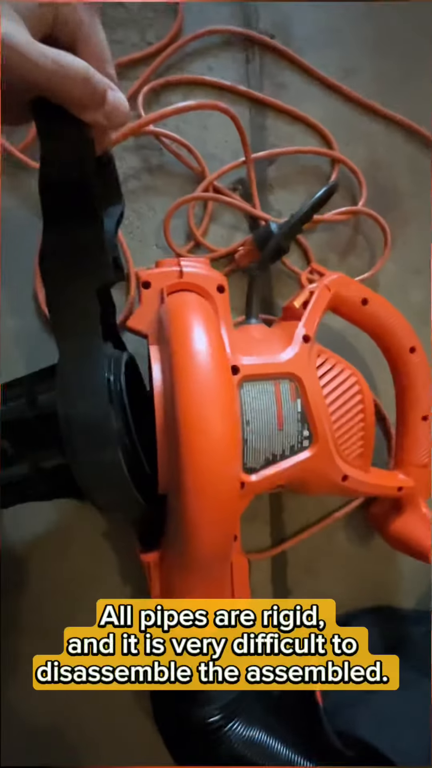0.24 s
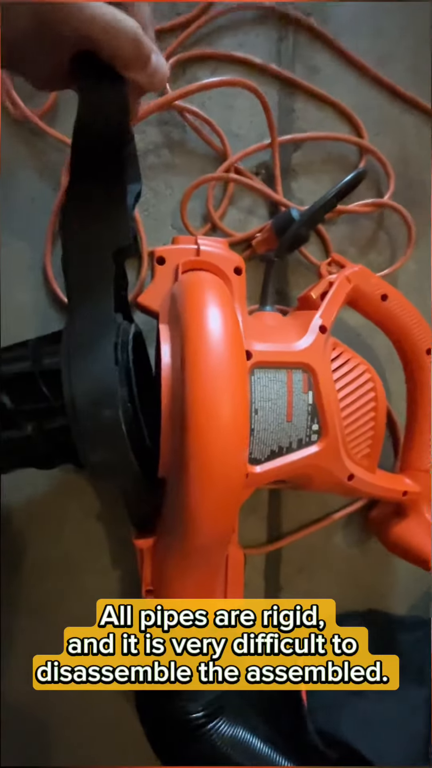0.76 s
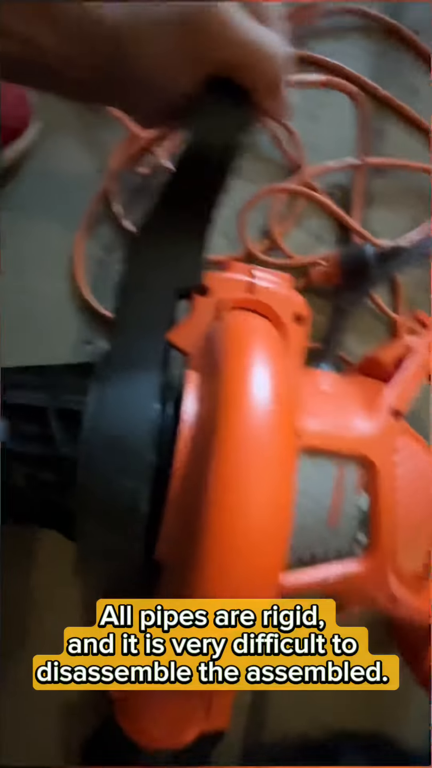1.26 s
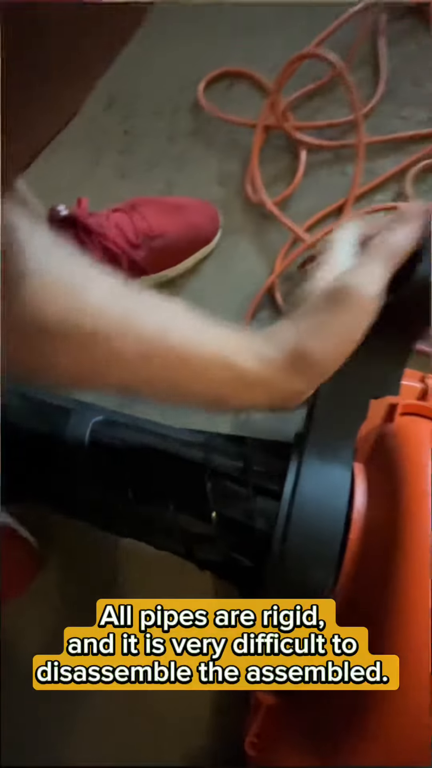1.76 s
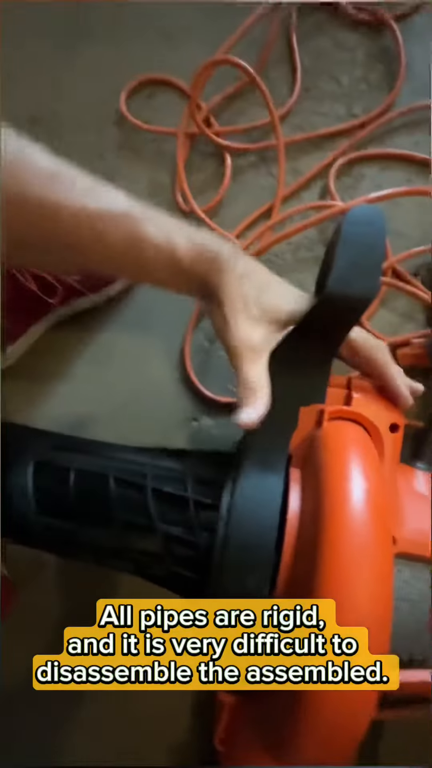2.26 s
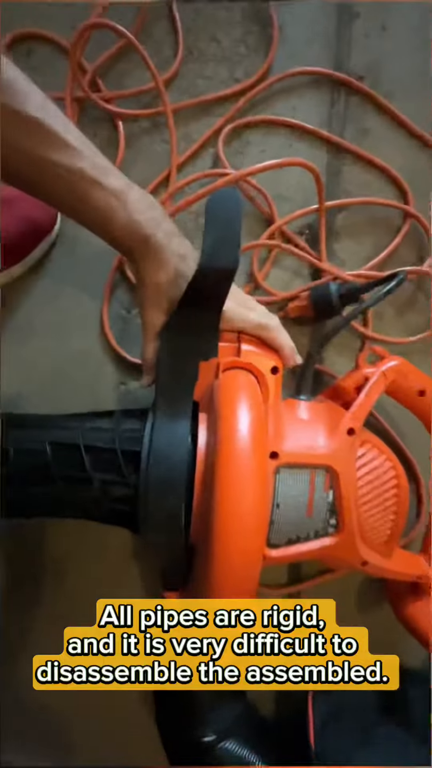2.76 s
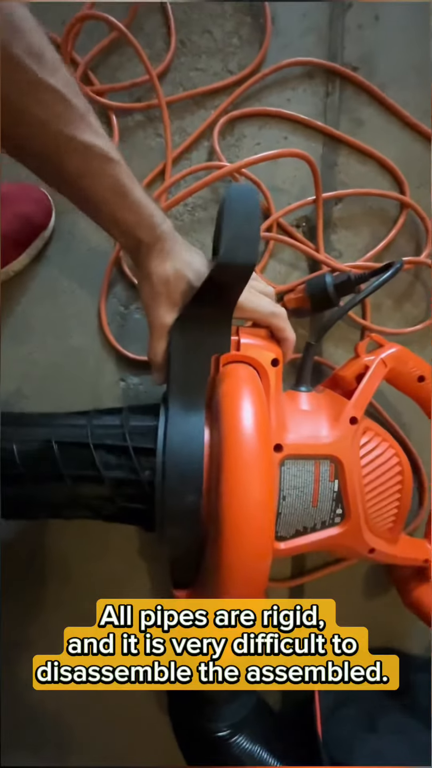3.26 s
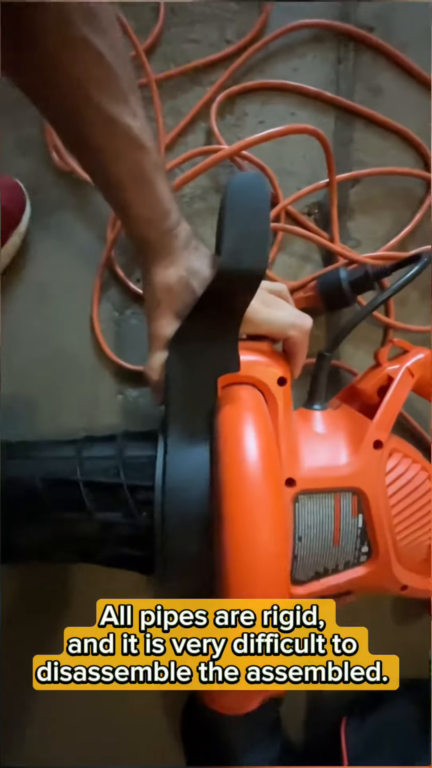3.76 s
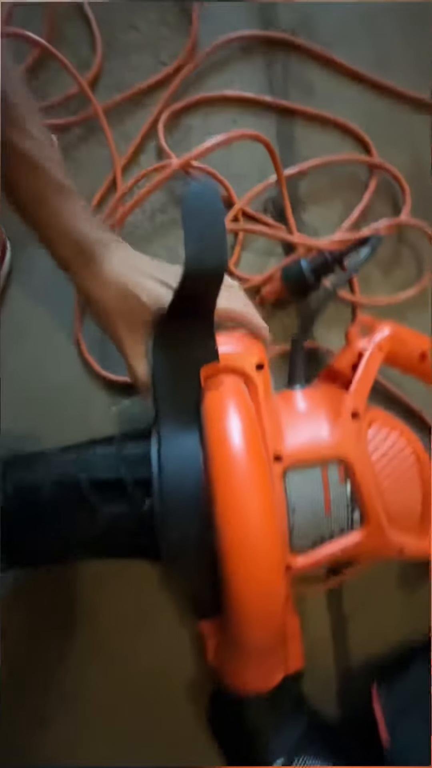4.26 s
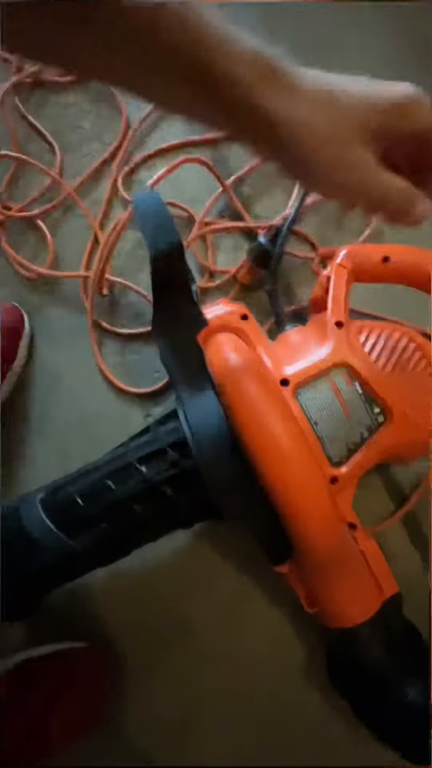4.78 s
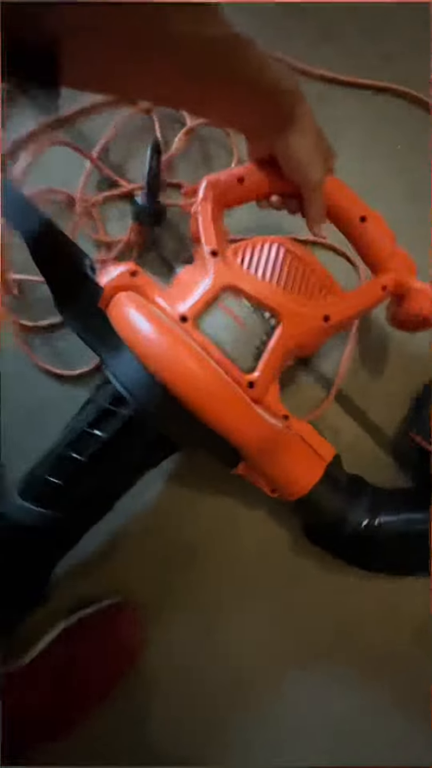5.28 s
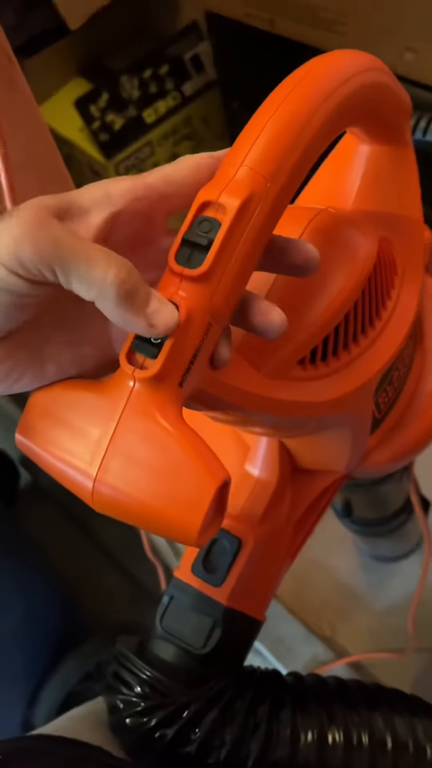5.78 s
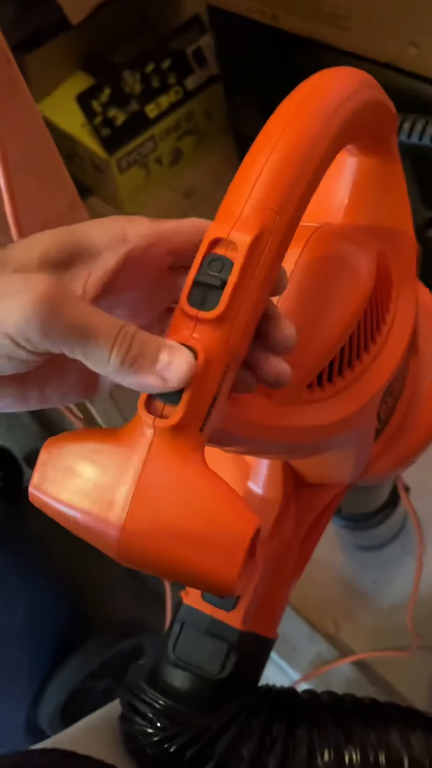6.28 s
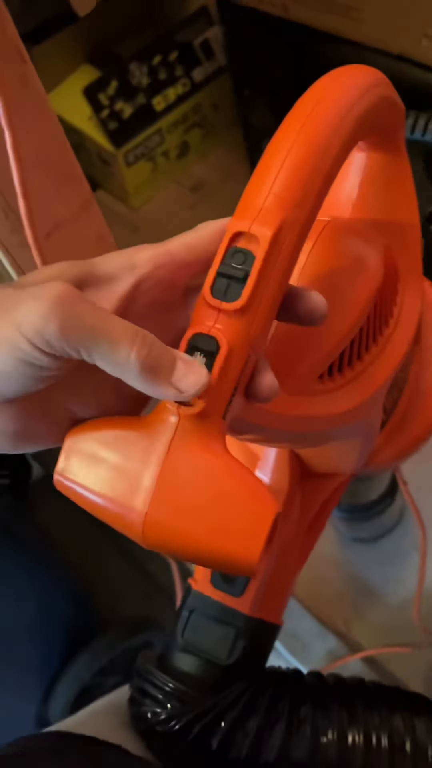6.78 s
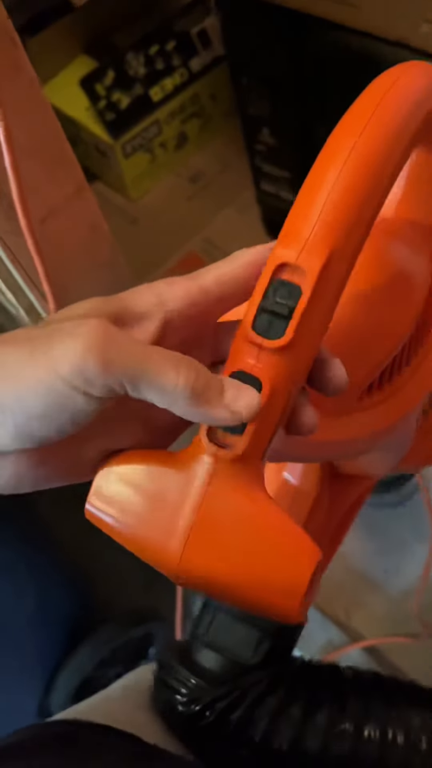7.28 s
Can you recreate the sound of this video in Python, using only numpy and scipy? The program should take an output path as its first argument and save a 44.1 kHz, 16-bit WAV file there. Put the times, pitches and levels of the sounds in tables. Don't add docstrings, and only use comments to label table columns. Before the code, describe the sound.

On a hard garage floor, hands twist and push hollow plastic blower parts together. Sharp cracks, hollow knocks and low thuds alternate with short scrapes, creaks and faint skin rubs, with the hardest snaps around the middle. Low handling rumble bumps the close stereo phone microphone. Then it switches abruptly to the blower already running, a steady broadband roar with hum and thin motor whine, through to the end.

```python
import sys
import numpy as np
from scipy import signal
from scipy.fft import rfft, irfft, next_fast_len
from scipy.io import wavfile
from scipy.ndimage import uniform_filter1d, map_coordinates

SR = 44100
rng = np.random.default_rng(int(sys.argv[2]) if len(sys.argv) > 2 else 0)


def voltage_ratio(level):
    return 10 ** (np.asarray(level, float) / 20)


def wrap_up_sound(samples):
    columns = np.atleast_2d(samples).T
    tamed = np.clip(columns, -1, 1)
    steps = np.round(tamed * 32767).astype(np.int16)
    wavfile.write(sys.argv[1], SR, steps)


N = 332073
WORKSHOP_S, RUNNING_S = (0, 5.5), (5.4, 7.6)
LEAN_DB = -1.5
STREAK_DB = 1.2


def unit(x):
    return x / np.sqrt(np.mean(x ** 2) + 1e-20)


def along(points, hz):
    f, v = np.transpose(points)
    return np.interp(np.log(hz + 1), np.log(f + 1), v)


def curves(rows):
    s, *cols = np.transpose(rows)
    return [np.interp(np.arange(N) / SR, s, c) for c in cols]


def wobble(rate):
    coarse = np.arange(0, N + 64, 64)
    knots = rng.standard_normal(int(N * rate / SR) + 4)
    return np.interp(np.arange(N), coarse, map_coordinates(knots, [coarse * rate / SR]))


def filtered(x, response):
    m = next_fast_len(x.shape[-1] + 8192)
    return irfft(rfft(x, m) * response(np.fft.rfftfreq(m, 1 / SR)), m)[..., :x.shape[-1]]


def stereo_noise(spectrum, alike, span, patchy_db, streak_db=0):
    first, last = (min(round(s * SR), N) for s in span)
    z = signal.stft(rng.standard_normal((2, last - first)), nperseg=512)[2]
    chance = rng.standard_normal((2,) + z.shape[1:])
    patches = uniform_filter1d(uniform_filter1d(chance[0], size=5, axis=0), size=10, axis=1)
    streaks = uniform_filter1d(uniform_filter1d(chance[1], size=2, axis=0), size=50, axis=1)
    gain = voltage_ratio(patchy_db * unit(patches) + streak_db * unit(streaks))
    pair = signal.istft(z * gain, nperseg=512)[1][:, :last - first]

    def middle_and_side(hz):
        angle = np.arccos(np.clip(along(alike, hz), -1, 1)) / 2
        return voltage_ratio(along(spectrum, hz)) * [np.cos(angle), np.sin(angle)]

    mid, side = filtered(pair, middle_and_side)
    return np.pad(np.array([mid + side, mid - side]) / np.std(mid), ((0, 0), (first, N - last)))


def strokes(s, hold_s, db, law):
    rise, fall, rest_db = law
    t = np.arange(0, N + 128, 128)[:, None] / SR
    each_db = db - rise * np.maximum(s - t, 0) - fall * np.maximum(t - s - hold_s, 0)
    total_db = 10 * np.log10((voltage_ratio(each_db) ** 2).sum(1) + voltage_ratio(rest_db) ** 2)
    return np.interp(np.arange(N) / SR, t[:, 0], total_db)


def resonances(table, lean, longest_s=2 / 3, shared=0.26):
    out = np.zeros((2, N))
    for start_s, end_s, centre_hz, width_hz, db in table:
        at = slice(round(start_s * SR), min(round(end_s * SR), N))
        noise = rng.standard_normal((2, round(longest_s * SR)))[:, :at.stop - at.start]
        noise = noise + shared * noise[::-1]
        song = filtered(noise, lambda hz: 1 / (1 + (2 * (hz - centre_hz) / width_hz) ** 2) ** 1.5)
        swell = np.abs(np.sin(np.pi * np.linspace(0, 1, song.shape[1]) ** lean)) ** 0.75
        out[:, at] += voltage_ratio(db) * unit(song) * swell
    return out


# t/s, hold/s, level/dB
SHAKES = [
    (0.0, 3.4, -50.5),
    (2.406, 1.5, -60.5),
    (3.78, 0.55, -51.5),
    (4.3, 0.071, -45.5),
    (4.516, 0.12, -36.5),
    (4.653, 0.04, -32.5),
    (4.74, .06, -34),
    (4.82, .03, -40),
    (4.898, 0.034, -39.5),
]
# f/Hz, level/dB per Hz
JOSTLE = [(22, -40), (40, -13), (58, 1), (145, -6.5), (250, -11.5), (500, -22.5), (900, -40), (1500, -84)]
# shake level/dB, opposition level/dB
OPPOSE = [(-63, -43.5), (-37, 8.5)]


def jostle():
    level_db = strokes(*np.transpose(SHAKES), law=(230, 250, -60.5))
    oppose_db = np.interp(level_db, *np.transpose(OPPOSE))
    noise = stereo_noise(JOSTLE, [(50, 0.018)], WORKSHOP_S, patchy_db=3.0)
    one, other = noise * voltage_ratio(1.4 * wobble(35))
    return voltage_ratio(level_db) * (0.55 * one + voltage_ratio(oppose_db - 0.5) * other * [[1.1], [-.9]])


# f/Hz, level/dB, time to fall 60 dB t/s
SHELL = [(851, -3.5, 0.047), (1000, -5, 0.032), (1092, 6, 0.006), (1267, 4.5, 0.012), (1484, 0.5, 0.014),
         (2010, -4, 0.014), (2340, -8.5, 0.0082)]
# f/Hz, level/dB
SNAP = [(300, -57), (900, 3.5), (1800, 0.5), (3500, -1), (5000, -6.5), (7000, -19), (16000, -62)]
# f/Hz, level/dB
SPARK = [(1500, -60), (3000, 2), (5500, 0), (10000, 14), (16000, -7.5)]
# f/Hz, level/dB
PUSH = [(25, -56), (70, -6.5), (200, 9.5), (450, 1.5), (800, -12), (2000, -90)]


def contacts(table, thump_db, give_s, crack_s, early_s):
    t = np.arange(SR // 5) / SR
    out = np.zeros((2, N + len(t)))
    colours = lambda hz: voltage_ratio([[along(points, hz)] for points in (SNAP, SPARK, PUSH)])
    noises = [unit(noise) for noise in filtered(rng.standard_normal((3, 2, N + len(t))), colours)]
    wall_hz, wall_db, wall_s = np.transpose(SHELL)[:, :, None]
    scatter_db = 2
    rise = (1 - np.exp(-t / give_s)) ** 2
    crack_fade = voltage_ratio(-60 * t / crack_s) + 0.075 * voltage_ratio(-60 * t / 0.11)
    thump = voltage_ratio(thump_db) * np.sin(2 * np.pi * 65 * (t - .026)) * np.exp(-((t - .026) / 0.0083) ** 2)
    late, sag, sag_s = np.maximum(t - .003, 0), 0.13, .025
    thud_turns = (1 - sag / 2) * late + sag * sag_s * (1 - np.exp(-late / sag_s))
    for s, crack_db, knock_db, thud_db, thud_hz in table:
        luck = rng.standard_normal((4, len(SHELL), 1))
        start = round((s - early_s) * SR)
        at = slice(start, start + len(t))
        grit, spark, puff = (noise[:, at] for noise in noises)

        hard_db = min(0.28 * (crack_db - knock_db) - 18.0, -3)
        crack = voltage_ratio(crack_db) * (grit + voltage_ratio(hard_db) * spark) * crack_fade

        ring_level = voltage_ratio(wall_db + scatter_db * luck[0] - 60 * t / (wall_s + crack_s))
        rings = ring_level * np.sin(2 * np.pi * wall_hz * (1 + 0.052 * luck[1]) * t)
        knock = voltage_ratio(scatter_db * luck[2:, :, 0]) @ rings

        fade = voltage_ratio(-60 * t / (0.2 * (200 / thud_hz) ** 1.2)) * (1 - t / t[-1]) ** 0.28
        swell = (1 - np.exp(-late / 0.0028)) * fade
        hollow = np.sin(2 * np.pi * thud_hz * thud_turns) + 0.076 * np.sin(2 * np.pi * 2.4 * thud_hz * t)
        body = 0.32 * (puff[0] + 0.78 * puff) * (1 - np.exp(-t / 0.0054)) * voltage_ratio(-60 * t / 0.13)
        thud = swell * hollow + body + thump

        sound = rise * (crack + voltage_ratio(knock_db - 5.5) * knock + voltage_ratio(thud_db + 4.5) * thud)
        out[:, at] += sound * voltage_ratio([[LEAN_DB / 2], [-LEAN_DB / 2]])
    return out[:, :N]


# t/s, crack peak level/dB, knock level/dB, thud level/dB, thud f/Hz
HITS = [(0.193, -46, -103, -59, 200), (0.2942, -38.5, -43.5, -59, 274), (0.3408, -37.5, -47, -58, 270),
        (0.7677, -50, -46, -49, 425), (1.492, -56, -64, -45, 230), (1.618, -23, -21, -23, 211.5),
        (1.9117, -39, -61, -41.5, 190), (2.037, -35, -57, -55, 194), (2.3525, -36, -39, -52, 200),
        (2.4186, -13.5, -17.5, -22.5, 211.5), (2.9325, -67, -35, -26.5, 255), (3.6318, -8, -21, -28, 342),
        (3.6433, -2.5, -25, -49, 180), (4.4318, -19, -14, -24.5, 205.4), (4.4432, -23.5, -75, -29, 205),
        (4.6088, -46, -32, -35, 475), (4.7374, -52, -50, -42, 640), (5.2335, -29.5, -31.5, -38.5, 358),
        (5.2917, -33.5, -41, -46, 430)]
# t/s, crack peak
# level/dB, knock level/dB, thud level/dB, thud f/Hz
SLIPS = [(0.475, -50, -38, -44, 460), (0.4939, -36, -31.5, -46, 443), (0.8345, -22.5, -24.5, -27, 399),
         (1.538, -60, -60, -46, 242), (2.245, -60, -60, -44, 250), (0.8437, -42, -29, -41, 208),
         (0.9452, -36, -45, -34, 408), (0.9599, -17.5, -27.5, -34, 261), (0.968, -51, -29.5, -27, 244),
         (1.0294, -53, -43, -37, 221), (1.069, -47, -39, -40, 417), (1.2082, -41, -56, -34, 249),
         (1.7, -50, -37, -36, 205), (2.1194, -19, -65, -45, 245), (2.1361, -57, -41, -36, 250),
         (2.4997, -43, -51, -47, 195),
         (2.992, -20, -21.5, -32, 445), (3, -29, -22, -24, 368), (3.1642, -48, -39, -34.5, 338),
          (3.1955, -36, -26, -37, 301), (3.221, -47, -39, -35.5, 370), (3.566, -45, -30.5, -30, 366),
          (3.6, -31.5, -43, -27.5, 365), (3.6285, -10.5, -53, -24.5, 365), (3.633, -60, -60, -32, 247),
          (3.65, -24, -25, -26.5, 199.6), (3.664, -9.5, -24, -55, 182), (4.092, -48, -43, -44, 420),
          (4.295, -31, -50, -37.5, 335), (4.349, -43, -37, -35, 346), (4.474, -27, -37, -26, 234),
          (4.937, -33.5, -106, -66, 172), (5.05, -41, -74, -71, 210), (5.369, -64, -70, -46, 174)]


def hits():
    snaps = contacts(HITS, thump_db=-15.5, give_s=.0007, crack_s=0.011, early_s=0)
    slips = contacts(SLIPS, thump_db=-15.0, give_s=0.003, crack_s=0.024, early_s=0.001915)
    return snaps + slips


# f/Hz, time to fall 60 dB t/s
GARAGE = [(150, 0.92), (1000, 0.4), (4000, 0.098), (12000, 0.87)]


def garage(x):
    hz, t, z = signal.stft(rng.standard_normal((2, SR)), SR, nperseg=256)
    tail = signal.istft(z * voltage_ratio(-60 * t / along(GARAGE, hz)[:, None]), SR, nperseg=256)[1]
    delayed = np.pad(x, ((0, 0), (500, 0)))
    return signal.fftconvolve(delayed, tail / np.linalg.norm(tail[0]), axes=1)[:, :N]


# t/s, hold/s, level/dB
SLIDES = [(0.287, 0.26, -76), (0.794, 0.048, -62.5), (0.95, 0.054, -58), (1.204, 0.049, -73.5),
          (1.417, 0.05, -68), (1.5, 0.08, -62), (1.602, 0.18, -55), (1.85, 0.056, -62.5),
          (1.99, 0.26, -60.5), (2.333, 0.05, -62), (2.5, 0.14, -76), (3.187, 0.11, -76), (3.47, 0.12, -79),
          (3.876, 0.07, -81), (4.113, 0.087, -66), (4.308, 0.052, -55.5), (4.47, 0.32, -69.5),
          (4.947, 0.016, -59.5), (5.054, 0.021, -57), (5.24, 0.065, -62), (5.31, .15, -62.5)]
# f/Hz, level/dB per Hz
PALM = [(3500, -21), (6000, -7), (8000, -3), (10000, 1.5), (12000, -4), (14000, -2.5), (16000, -13)]


def palms(stutter_db):
    level_db = strokes(*np.transpose(SLIDES), law=(270, 113, -84.5))
    noise = stereo_noise(PALM, [(3000, .05)], WORKSHOP_S, patchy_db=1.5, streak_db=STREAK_DB)
    return voltage_ratio(level_db + stutter_db + 2.15 * wobble(79)) * noise


# t/s, hold/s, level/dB, rub over scrape level/dB
DRAGS = [(0.456, 0.38, -54.5, -12), (0.791, 0.033, -48, -7), (0.952, 0.031, -43, -10),
         (1.459, 0.12, -57.5, 0), (1.613, 0.16, -48.5, -3.5), (1.983, 0.29, -53, -0.5),
         (2.42, 0.093, -44.5, -9.5), (2.976, 0.058, -46, -15.5), (3.194, 0.033, -46, -18.5),
         (3.662, 0.016, -35, -2.5), (3.74, 0.18, -37, -4.5), (4.27, 0.11, -48.5, -2),
         (4.441, 0.043, -41, -7), (4.588, 0.04, -50, -4.5), (4.945, 0.018, -77, 15.5),
         (5.067, 0.084, -59.5, 1.2), (5.227, 0.042, -46.5, -8.5), (5.36, .15, -49.5, -4)]
# f/Hz, level/dB per Hz
SCRAPE = [(60, -45), (130, -23), (195, -6), (440, 0.5), (650, -3.5), (1070, 0), (2200, -15.5), (8000, -69)]
# f/Hz, level/dB per Hz
RUB = [(900, -16), (1800, 8), (2300, 5), (3500, 3.5), (4600, 1), (5600, -2.5), (7000, -12), (10000, -32)]


def drags(stutter_db):
    s, hold_s, db, bright_db = np.transpose(DRAGS)
    scrape_db = strokes(s, hold_s, db, law=(300, 54, -58))
    rub_db = strokes(s, hold_s, db + bright_db, law=(370, 68, -71))
    scrape = stereo_noise(SCRAPE, [(200, 0.37), (800, 0.0087)], WORKSHOP_S, patchy_db=1.05, streak_db=1.65)
    rub = stereo_noise(RUB, [(3000, 0.013)], WORKSHOP_S, patchy_db=1.0, streak_db=STREAK_DB)
    return voltage_ratio(scrape_db + stutter_db) * scrape + voltage_ratio(rub_db + stutter_db) * rub


# from t/s, to t/s, f/Hz, width f/Hz, level/dB
CREAKS = [(.45, 0.56, 2560, 2900, -59.5), (4.52, 4.9, 370, 570, -40.5), (1.63, 1.817, 1820, 110, -54),
          (1.947, 2.188, 1050, 72, -54), (1.986, 2.37, 1860, 150, -55.5), (2.458, 2.777, 3340, 590, -60.5),
          (.45, 0.54, 2400, 120, -57), (.45, 0.53, 1180, 900, -46), (0.47, 0.89, 4150, 450, -70),
          (.5, 1.1, 4660, 350, -71), (.6, 0.7, 2000, 1100, -59), (.76, .835, 900, 220, -50),
          (.77, .835, 1600, 200, -51.5), (.77, .835, 2220, 270, -54), (3.33, 3.52, 114, 20, -51.5),
          (3.3, 3.5, 370, 62, -59), (4.53, 4.67, 2500, 130, -60), (4.44, 4.52, 4150, 400, -55),
          (4.28, 4.34, 3360, 400, -57), (4.3, 4.44, 1400, 400, -48), (4.31, 4.44, 4500, 500, -53),
          (5.214, 5.433, 1920, 830, -48)]
# from t/s, to t/s, f/Hz, width f/Hz,
# level/dB
SETTLES = [(3.66, 4.3, 1870, 1300, -40), (3.66, 4.25, 5100, 1500, -48.5), (3.66, 4.2, 8700, 2100, -60),
           (3.2, 3.45, 910, 230, -47), (1.64, 1.93, 192, 27, -40.5), (1.8, 1.94, 450, 39, -55),
           (1.64, 1.8, 2370, 300, -54), (2.5, 2.66, 202, 40, -40), (4.94, 5.0, 4850, 1000, -53),
           (5.233, 5.27, 600, 400, -37), (3.2, 3.42, 1630, 360, -54), (3.4, 3.56, 270, 110, -65),
           (2.44, 2.64, 473, 56, -46.5), (.85, .95, 330, 410, -40), (2.96, 3.0, 11000, 5000, -65),
           (3.03, 3.2, 423, 190, -40.5), (3.68, 4.25, 1130, 200, -42), (3.68, 4.1, 1400, 120, -46),
           (3.68, 4.0, 520, 190, -42)]


def creaks():
    return (resonances(CREAKS, lean=0.81) + resonances(SETTLES, lean=0.2)) * voltage_ratio(2.2 * wobble(60))


# t/s, peak level/dB, f/Hz, time to fall 60 dB t/s
PANELS = [(0.497, -31, 964, 0.025), (0.834, -27.5, 1550, 0.052), (0.962, -29, 555, 0.051),
          (1.065, -34, 1250, 0.04), (1.422, -42, 530, 0.04), (1.618, -21, 893, 0.035),
          (2.133, -29, 1030, 0.065), (2.353, -34, 1005, 0.055), (2.418, -12.5, 885, 0.03),
          (2.932, -23.5, 1050, 0.031), (2.993, -29, 1330, 0.027), (3, -25, 1110, 0.036),
          (3.166, -32, 1100, 0.034), (3.1945, -17, 905, 0.038), (3.22, -33, 1140, 0.037),
          (3.566, -34, 1110, 0.055), (4.432, -18, 830, 0.035), (4.609, -28, 880, 0.02),
          (5.233, -23, 585, 0.034), (5.291, -29.5, 1380, 0.033), (5.343, -37, 1390, 0.04)]
# t/s, peak level/dB, f/Hz, time to fall 60 dB t/s
OVERTONES = [(1.618, -31, 1270, 0.023), (1.618, -29, 2040, 0.032), (1.618, -32, 2480, .025),
             (1.618, -35, 3600, .015), (3.638, -14.5, 2050, .03), (3.644, -12.5, 2000, 0.03),
             (3.658, -20, 1700, 0.055), (4.432, -18, 1286, 0.033), (4.609, -26, 1300, .018),
             (.835, -33, 920, .03), (.962, -29, 1340, .04), (.961, -30, 3800, 0.017),
             (2.945, -27, 313, 0.075), (4.433, -30, 3300, .02), (3.6345, -11.5, 310, 0.038),
             (3.6378, -9, 335, 0.017), (3.67, -24, 1150, .05), (3.1945, -22.5, 1120, 0.032),
             (3.197, -31.5, 1650, 0.046), (2.449, -24.5, 194, 0.11), (.848, -28, 95, .07),
             (.498, -36, 1400, .02), (1.4955, -30, 210, 0.039), (2.465, -31, 95, .06)]


def panels():
    t = np.arange(SR // 10) / SR
    rise = 1 - np.exp(-t / 0.0015)
    out = np.zeros(N)
    for s, db, hz, t60 in list(PANELS) + OVERTONES:
        out[round(s * SR):][:len(t)] += voltage_ratio(db - 60 * t / t60) * rise * np.sin(2 * np.pi * hz * t)
    return out * voltage_ratio([[LEAN_DB / 2], [-LEAN_DB / 2]])


# t/s, peak level/dB, f/Hz
BUMPS = [
    (4.548, -22, 75),
    (4.66, -21, 90),
    (4.69, -17, 70),
    (4.752, -16, 60),
    (4.79, -21, 80),
    (4.835, -20, 65),
    (4.908, -16.5, 75),
]


def bumps():
    t = np.arange(-SR // 20, SR // 20) / SR
    out = np.zeros(N)
    for s, db, hz in BUMPS:
        cycle = np.sin(2 * np.pi * hz * t) * np.exp(-(hz * t / 0.88) ** 2)
        out[round(s * SR) - SR // 20:][:len(t)] += voltage_ratio(db) * cycle
    return out * [[1.2], [-.8]]


def hands():
    stutter_db = 1.2 * wobble(35)
    return jostle() + bumps() + drags(stutter_db) + palms(stutter_db) + creaks()


def turned(late_s=0):
    turn_s, lasts_s = 6.45, 0.13
    return .5 + .5 * np.tanh((np.arange(N) / SR - turn_s - late_s) / lasts_s)


# t/s, roar level/dB
FLOW = [
    (5.47, -28),
    (5.51, -29),
    (6.0, -28),
    (6.4, -28),
    (6.74, -25),
    (7.13, -27.5),
    (7.33, -26.5),
    (7.53, -27),
]
# f/Hz, level/dB per Hz
ROAR = [(30, -44), (60, -13), (130, -9.5), (260, -10), (500, -13), (900, -4), (1150, -8), (1400, -82)]
# f/Hz, level/dB per Hz
RUSH = [(900, -63), (1200, -0.5), (1700, -8.5), (1800, -11.5), (2400, -6.5), (2700, -5.5), (3300, -33)]
# f/Hz, level/dB per Hz
HISS = [(2200, -50), (2800, 2.5), (5300, 3.5), (6300, -0.5), (8000, -3.5), (11000, -7), (13000, -6.5),
        (16000, -17.5)]
# f/Hz, width f/Hz, boost level/dB
HOUSING = [(195, 50, 11.5), (316, 65, 6), (448.5, 85, 16), (654, 115, 13), (876, 120, -3.5),
           (1058, 48, 6.5), (1247, 11, 7.5), (1517, 116, 6.5), (1634, 60, 6), (2090, 340, 3)]
# f/Hz, width f/Hz, share removed [0 to 1]
NOTCHES = [(249, 28, 0.5), (535, 26, .5), (586, 21, 0.48), (1170, 50, 0.44), (1587, 35, 0.54)]
# f/Hz, likeness [0 to 1]
ALIKE = [(60, 0.93), (150, 0.96), (600, 0.76), (1500, 0.73), (4000, 0.62), (10000, 0.7)]


def air():
    roar_db, = curves(FLOW)
    steady_db = np.mean(FLOW, axis=0)[1]
    away_db = -3 * turned(late_s=0.24)
    rush_db = roar_db - 5.5 + away_db
    hiss_db = steady_db + 0.24 * (roar_db - steady_db) - 15 + .5 * away_db

    def housing(hz):
        bell = lambda centre_hz, width_hz: 1 / (1 + (2 * (hz - centre_hz) / width_hz) ** 2)
        peaks = 1 + sum(voltage_ratio(db) * bell(c, w) for c, w, db in HOUSING)
        return peaks * np.prod([1 - share * bell(c, w) for c, w, share in NOTCHES], axis=0)

    roar = filtered(stereo_noise(ROAR, ALIKE, RUNNING_S, patchy_db=0.5, streak_db=-0.47), housing)
    rush = filtered(stereo_noise(RUSH, ALIKE, RUNNING_S, patchy_db=0.5, streak_db=0.5), housing)
    hiss = stereo_noise(HISS, ALIKE, RUNNING_S, patchy_db=1.0, streak_db=STREAK_DB)
    gust_db = wobble(24)
    roar = voltage_ratio(roar_db + 0.51 * gust_db) * roar / np.std(roar[:, -2 * SR:])
    rush = voltage_ratio(rush_db + 1.13 + 0.12 * gust_db) * rush / np.std(rush[:, -2 * SR:])
    return roar + rush + voltage_ratio(hiss_db + 6 + 0.17 * gust_db) * hiss


# t/s, f/Hz
SPEED = [
    (5.45, 187.8),
    (6.0, 187.3),
    (6.7, 187.3),
    (7.0, 188.2),
    (7.3, 189.7),
    (7.53, 190.2),
]
# shaft multiple, mains multiple, level/dB before the turn, level/dB after,
# level/dB once turned back, left over right level/dB
TONES = [(1, 0, -41, -40, -44, -0.5), (2, 0, -44, -45, -48, 1), (3, 0, -39, -48, -48.5, -9.5),
         (6, 0, -54.5, -46, -50, -12), (9, 0, -49, -49, -60, 2), (12, 0, -51, -40.5, -44.5, 1.5),
         (12, 1, -47.5, -52, -53, 0), (12, 2, -49, -60, -49.5, -3), (12, 3, -50, -52, -54, -5),
         (24, 1, -54, -52, -57, 0), (18, 0, -70, -60, -50.5, 0)]


def motor():
    speed_hz = curves(SPEED)[0] * (1 + .0003 * wobble(25))
    shaft = 2 * np.pi * np.cumsum(speed_hz) / SR
    mains = 2 * np.pi * 60 * np.arange(N) / SR
    facing, back = turned(), turned(late_s=0.45)
    out = np.zeros((2, N))
    for order, multiple, db, after_db, back_db, pan_db in TONES:
        level_db = db + (after_db - db) * facing + (back_db - after_db) * back
        level_db = level_db + 2.2 * wobble(12)
        tone = np.sqrt(2) * voltage_ratio(level_db) * np.sin(order * shaft + multiple * mains)
        out += tone * voltage_ratio([[pan_db / 2], [-pan_db / 2]])
    return out


# from t/s, to t/s, f/Hz, width f/Hz, level/dB
DRIFTS = [
    (5.3, 7.0, 1660, 85, -40.5),
    (7.0, 7.53, 303, 110, -39),
    (6.3, 7.05, 700, 200, -39),
    (6.7, 7.53, 406, 39, -44),
    (4.9, 6.8, 860, 68, -45),
]
# f/Hz, lead [radians]
LEAD = [(0, 0), (2100, .4), (2700, 2.1), (4500, 1.6), (7750, 5.9), (10200, 6.6), (14600, 12.6), (16600, 13)]
# f/Hz, level/dB
TILT = [(60, 5), (110, -2.5), (380, -2.5), (1290, 1), (2380, -1.0), (4400, -1.5), (8120, 0)]


def blower():
    port = lambda hz: voltage_ratio(along(TILT, hz) / 2) * np.exp(.5j * np.interp(hz, *np.transpose(LEAD)))
    machine = air() + motor() + resonances(DRIFTS, lean=1, longest_s=2, shared=.65)
    return filtered(machine, lambda hz: np.array([port(hz), 1 / port(hz)]))


def scene():
    plastic = hits() + panels()
    workshop = plastic + voltage_ratio(-11.0) * garage(plastic) + hands()
    fade = np.clip((np.arange(N) / SR - 5.432) / .024, 0, 1)
    return np.sqrt(1 - fade) * workshop + fade * blower()


def thinned(x, gaps, faint_db):
    hz, t, z = signal.stft(x, SR, nperseg=1024)
    click = np.abs(z[hz > 11000]).mean(0) > voltage_ratio(-79)
    hz = hz[:, None]
    cell = uniform_filter1d(np.abs(z), size=7, axis=0)
    loudness = uniform_filter1d(cell[20:].mean(0), size=9)
    gone = cell < voltage_ratio(faint_db + 7 * np.log2((hz + 1) / 14000)) * loudness ** .6
    gone &= hz > 5500
    for low_hz, high_hz, start_s, end_s in gaps:
        luck = np.repeat(rng.random((3, len(t) // 2 + 1)), 2, axis=1)[:, :len(t)]
        above = hz > low_hz * (1 - .06 * (luck[0] > .75) * (low_hz > 6000))
        below = hz < high_hz + 500 * (luck[1] > .5)
        gone |= above & below & (t > start_s) & (t < end_s) & ~click
    return signal.istft(z * ~gone, SR, nperseg=1024)[1][:N]


# low f/Hz, high f/Hz, from t/s, to t/s
SUM_GAPS = [(5700, 6500, 5.47, 6.505), (5700, 6500, 6.55, 7.32), (5700, 6500, 7.36, 8),
            (11700, 13700, 0, 8), (13000, 16000, 3.73, 4.07), (13000, 16000, 4.35, 4.425),
            (13000, 16000, 4.47, 4.89), (10800, 12000, 4.6, 4.75), (13000, 16000, 5.13, 5.19),
            (13000, 15300, 5.26, 5.33)]
# low f/Hz, high f/Hz, from t/s, to t/s
DIFFERENCE_GAPS = [(8200, 9700, 5.47, 8), (14600, 16000, 0, 8)]


def thin_treble(pair):
    left, right = pair
    mid = thinned((left + right) / 2, SUM_GAPS, faint_db=-56)
    side = thinned((left - right) / 2, DIFFERENCE_GAPS, faint_db=-68)
    return np.array([mid + side, mid - side])


def top_cut(x):
    return signal.sosfilt(signal.butter(12, 17020, fs=SR, output="sos"), x)


def record(dry):
    mix = thin_treble(filtered(dry, lambda hz: hz < 15830))
    return top_cut(mix)


dry = scene()
out = record(dry)
wrap_up_sound(out)
```